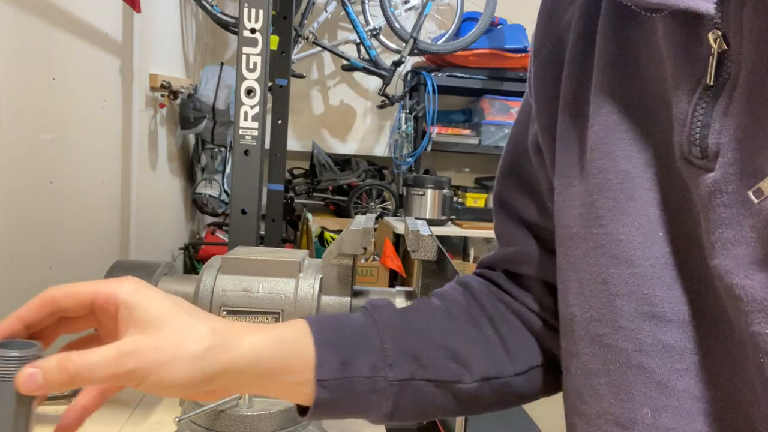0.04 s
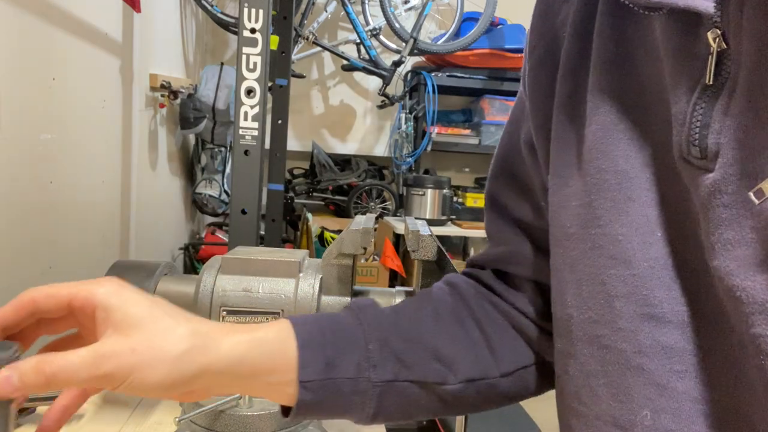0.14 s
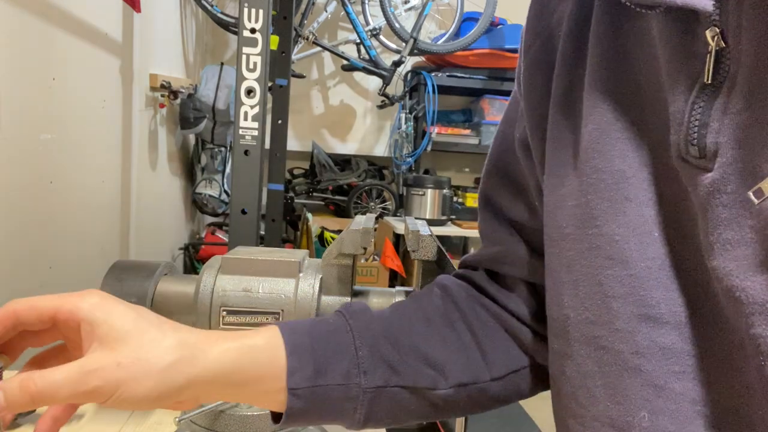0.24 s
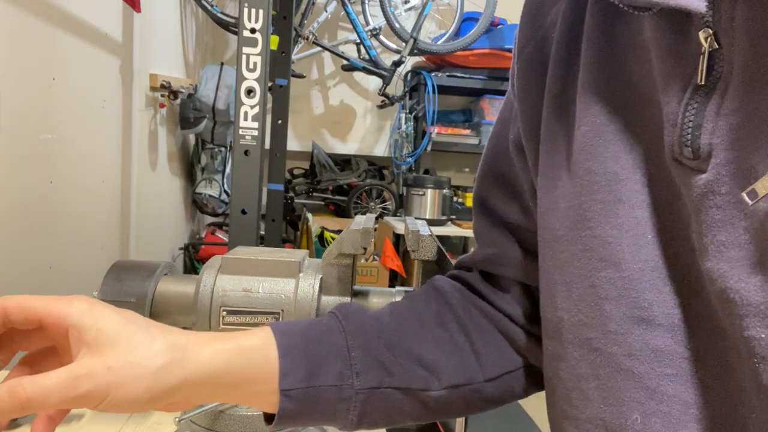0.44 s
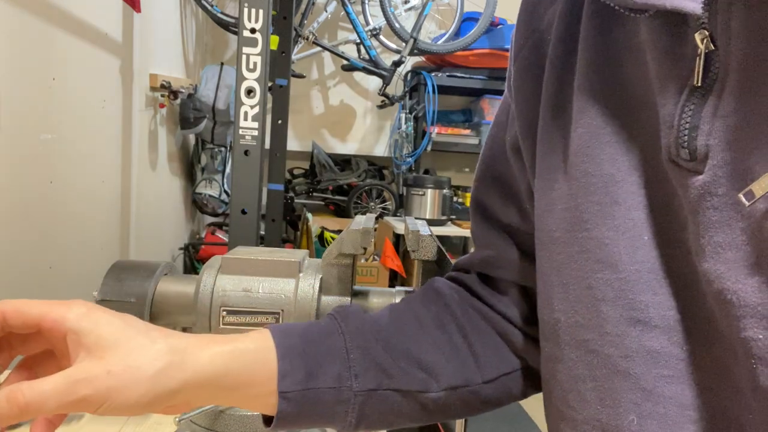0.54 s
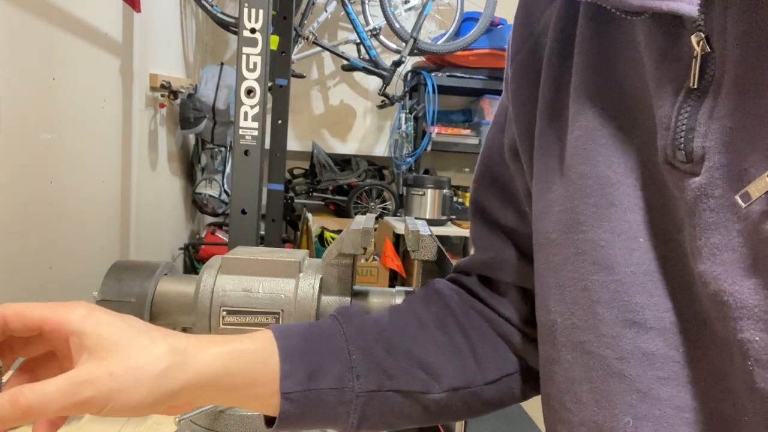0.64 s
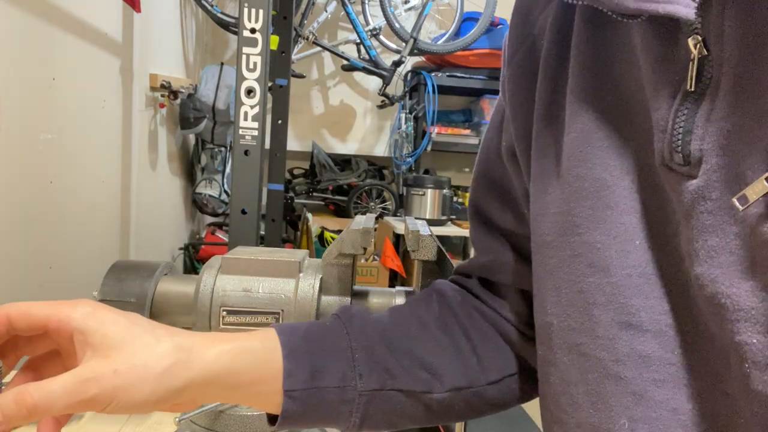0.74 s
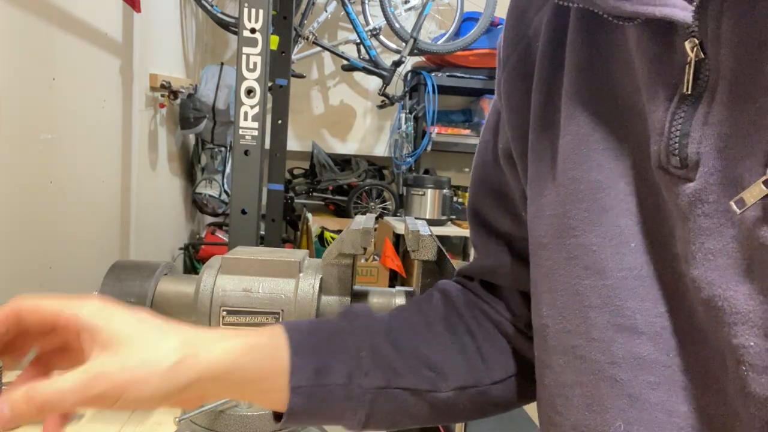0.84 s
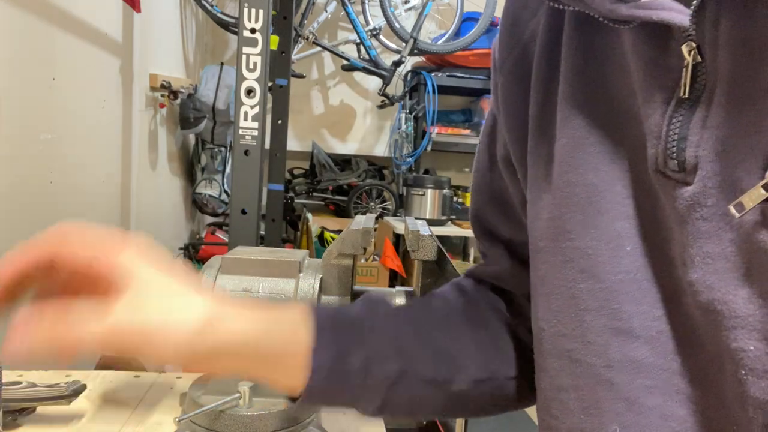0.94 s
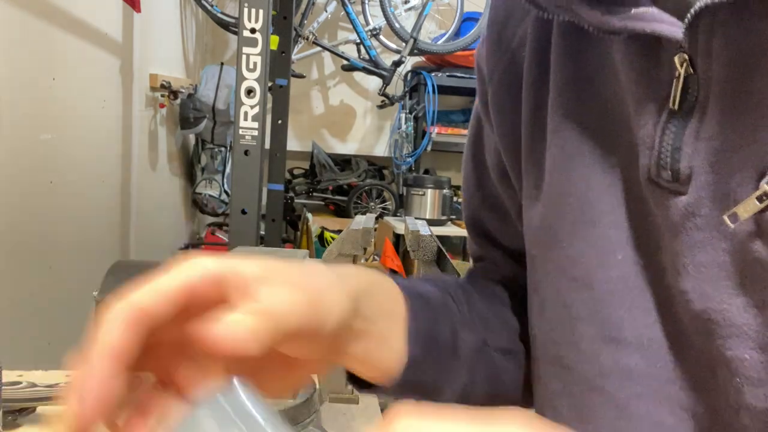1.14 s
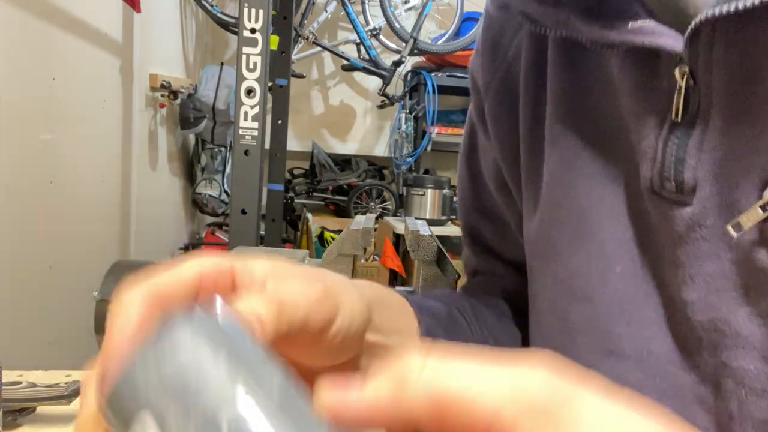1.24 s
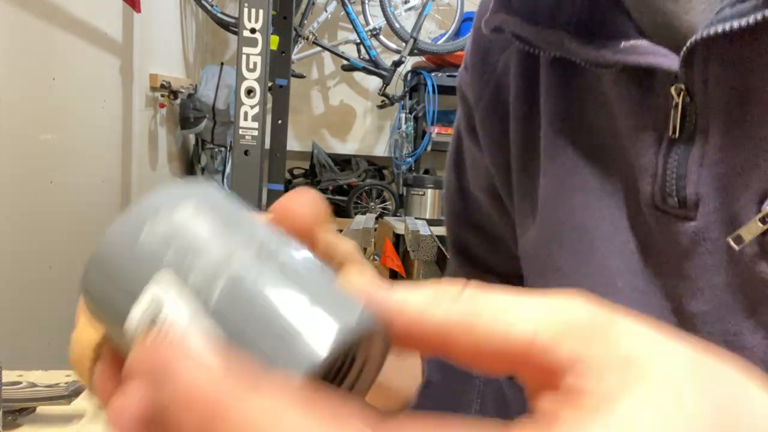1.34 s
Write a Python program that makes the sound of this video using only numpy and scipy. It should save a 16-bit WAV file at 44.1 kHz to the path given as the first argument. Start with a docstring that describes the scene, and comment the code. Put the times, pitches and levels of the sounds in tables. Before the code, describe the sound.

A hard plastic pipe fitting lands on a wooden bench with one loud hollow knock as an earlier knock fades; the garage rings briefly, then faint finger brushing, a soft tap and a tick, heard close.

```python
"""Plastic fitting on a workbench

A hard plastic pipe fitting is set down on a wooden bench in a garage, close by on the left: damped modes.
It rocks while an earlier knock (fading noise) dies away, then lands with one hollow knock that rings in the room.
Fingers brush the plastic (grainy noise); then come a soft tap, a sleeve rustle and one sharp tick (noise bands).
Low rumble and faint hiss, both steady noise, lie under it all."""
import sys
import numpy as np
from scipy import signal
from scipy.fft import rfft, irfft, next_fast_len
from scipy.io import wavfile
from scipy.ndimage import map_coordinates

SR = 44100
rng = np.random.default_rng(int(sys.argv[2]) if len(sys.argv) > 2 else 0)


def bounce(signal):
    """Save signal as a 16-bit WAV file at the path given by the first command-line argument."""
    frames = np.transpose(np.atleast_2d(signal))
    limited = np.clip(frames, -1, 1)
    pcm = np.round(limited * 32767).astype(np.int16)
    wavfile.write(sys.argv[1], SR, pcm)


N = 61739

# Still air, rumble and hiss. Each row: frequency in Hz, relative level in dB per Hz.
RUMBLE_SPECTRUM = [(25, -22), (45, -14.5), (74, 3.5), (97, -14), (122, -8), (150, -25), (205, -19),
                   (300, -28.5), (430, -28), (600, -39), (1500, -56)]
HISS_SPECTRUM = [(1000, 5.5), (2500, -1.5), (6000, -6.5), (8400, -0.5), (10500, -14.5), (12500, -9)]
RUMBLE_DB, HISS_DB = -63, -81.5

# Earlier knock, already fading. Each row: frequency in Hz, relative level in dB per Hz.
FADING_SPECTRUM = [(30, -23.5), (70, -4.5), (200, -2), (400, 0.5), (560, 5), (850, -5.5), (1100, -13.5),
                   (1600, -26.5), (2300, -38), (8000, -55.5)]
FADING_DB = -35
# Rocking contacts. Each row: start in seconds, level in dB.
ROCKING = [(0.063, -40), (0.085, -39), (0.129, -41)]
# Modes rung by rocking. Each row: frequency in Hz, relative level in dB, T60 in seconds.
ROCK_MODES = [(530.4, 1.5, 0.069), (626, 1, 0.04)]

LEAD_IN_GROWTH_S, LEAD_IN_FINAL_DB = 0.0034, -23

# Rim contacts of the knock. Each row: start in seconds, level in dB, left over right in dB.
RIM_CONTACTS = [(0.23286, -3.9, 6.1), (0.23496, -4.4, 4.3), (0.23779, 2, -1.2), (0.2506, -8.2, -.8)]
# Modes of the hollow fitting. Each row: frequency in Hz, level in dB, T60 in seconds, left over right in dB.
FITTING_MODES = [(845, -3.9, .044, 3), (1076, -13, .028, 4), (1179, -24.6, .13, -3), (1273, -28, .045, 4),
                 (1376, -30, .059, -7), (1636, -36, .079, 4), (2420, -35, .04, -5)]
# Modes of the bench top. Each row: frequency in Hz, level in dB, T60 in seconds, left over right in dB.
BENCH_MODES = [(108, -27, .18, 4), (168, -32, .22, 4), (240, -18, .1, 2), (322, -19, .09, -3),
               (380, -18.5, .086, -4), (442, -13.4, .052, -1), (527, -15.5, .11, 7), (574, -15, .04, 7),
               (631, -22.8, .08, 3), (705, -27, .15, 5)]
ATTACK_S, BENCH_ATTACK_S, RIGHT_LAG_S = .00048, .00085, .00031
LOW_CUT_HZ = 75
# Noise of the first contact. Each row: frequency in Hz, relative level in dB.
CRACK_SPECTRUM = [(1200, -10), (2400, 7), (3100, -4.5), (9300, -14), (10500, -29.5), (13000, -17),
                  (15000, -37.5)]
CRACK_DB, CRACK_T60_S, CRACK_SIDE_DB = -41, 0.15, -2.5
SNAP_DB, SNAP_T60_S, SNAP_RISE_S = -39, 0.016, 0.0006  # hard first instant of the crack

# Lingering garage resonances. Each row: frequency in Hz, level in dB.
ROOM_MODES = [(129, -32), (376, -31.5), (481, -34), (838, -34.5), (1068, -43), (1165, -40.5)]
# Garage decay. Each row: frequency in Hz, T60 in seconds.
ROOM_T60 = [(80, 0.74), (210, 0.5756), (1200, 0.5945), (2200, 0.4677), (4000, 0.47), (8000, 0.2745),
            (13000, 0.29)]
# Colour of the garage's answer. Each row: frequency in Hz, relative level in dB.
ROOM_COLOUR = [(40, -27), (70, -7.5), (130, -1), (230, -4), (400, 1), (700, 2), (900, -4), (1170, 0.5),
               (1450, -8), (1800, -21.5), (2400, -21), (4000, -32), (9200, -36.5), (10300, -55.5),
               (13000, -47.5)]
# Stereo likeness. Each row: frequency in Hz, left-right correlation from -1 to 1.
ROOM_ALIKE = [(300, 0.89), (700, -0.38), (5000, 0.34)]
WASH_DB, RING_WET_DB = -21.5, -20
ROOM_MODE_T60_S, ROOM_BUILD_S = .5, .017

# Brushing stroke. Each row: time in seconds, treble level in dB, upper middle level in dB.
BRUSH_LEVELS = [(0.615, -100, -102), (0.64, -67, -80), (0.668, -58.5, -74.5), (0.68, -53.5, -63.5),
                (0.728, -62, -65.5), (0.765, -68, -78), (0.785, -85, -92), (0.82, -108, -115)]
# Colours of the two brushing layers. Each row: frequency in Hz, relative level in dB.
BRUSH_TOP_SPECTRUM = [(4000, -40.5), (6500, -16), (8600, 3), (10300, -17), (11700, 7), (13600, 8),
                      (14500, -12.5)]
BRUSH_BODY_SPECTRUM = [(500, -5), (1500, -9), (2200, -7), (2800, -24), (3700, -0.5), (5500, -7.5),
                       (8000, 0.5), (11000, -23.5)]
# Narrow noise bands: a soft swell as brushing starts, a faint fading one, one sharp tick in three bands.
# Each row: start in seconds, level in dB, centre in Hz, width at half amplitude in Hz, attack in seconds,
# T60 in seconds.
NOISE_BANDS = [(0.641, -65.5, 2110, 445, 0.012, 0.24), (1.27, -77, 3980, 150, 0.025, 0.33),
               (1.359, -55.5, 4066, 90, 0.0022, 0.028), (1.359, -63.5, 12700, 2500, .003, 0.035),
               (1.359, -60, 8900, 1400, 0.0022, 0.033)]
# Modes of the soft tap. Each row: frequency in Hz, level in dB.
TAP_MODES = [(450, -64.5), (690, -59.5), (850, -60.5)]
TAP_S, TAP_T60_S = .9905, .02
# Sleeve rustle as the arm comes back. Each row: time in seconds, level in dB.
SLEEVE_LEVELS = [(1.12, -103), (1.27, -76.5), (1.335, -81.5), (1.36, -72), (1.4, -73.5)]
# Colour of the rustle. Each row: frequency in Hz, relative level in dB.
SLEEVE_SPECTRUM = [(1000, 0), (4200, 1), (6300, -11.5), (8600, 8), (10500, -11), (12800, 2)]

TOP_HZ = 15100


def amp(db):
    """Decibels to gain."""
    return 10 ** (np.asarray(db) / 20)


def unit(x):
    """Scaled to rms 1."""
    return x / np.sqrt(np.mean(x ** 2) + 1e-20)


def along(points, hz):
    """(Hz, value) points read on a log frequency axis."""
    f, v = np.transpose(points)
    return np.interp(np.log(hz + 1), np.log(f + 1), v)


def since(s):
    """Seconds since a moment, zero before it."""
    return np.maximum(np.arange(N) / SR - s, 0)


def curves(rows):
    """One value per sample for each column after the time."""
    s, *cols = np.transpose(rows)
    return [np.interp(since(0), s, c) for c in cols]


def filtered(x, response):
    """x times a response of frequency."""
    m = next_fast_len(N + SR // 2)
    return irfft(rfft(x, m) * response(np.fft.rfftfreq(m, 1 / SR)), m)[..., :N]


def noise(spectrum, alike):
    """Coloured stereo noise of rms 1; the mid-side balance sets the left-right correlation."""
    def mid_side_response(hz):
        turn = np.arccos(np.clip(along(alike, hz), -1, 1)) / 2
        return amp(along(spectrum, hz)) * [np.cos(turn), np.sin(turn)]

    mid, side = filtered(rng.standard_normal((2, N)), mid_side_response)
    return unit(np.array([mid + side, mid - side]))


def pan(db):
    """Left and right gains for a left-over-right ratio in dB."""
    return amp(np.array([[db], [-db]]) / 2)


def decay(t, t60_s):
    """Exponential decay, 60 dB down after t60_s."""
    return np.exp(-np.log(1000) * t / t60_s)


def strike(t, attack_s, t60_s):
    """Quick rise and exponential decay."""
    return (1 - np.exp(-t / attack_s)) * decay(t, t60_s)


def sine(hz, t):
    """Sine starting at phase zero."""
    return np.sin(2 * np.pi * hz * t)


def dying(x, s):
    """From time s on, each frequency of x dies at the room's own speed."""
    hz, t, z = signal.stft(x, SR, nperseg=512)
    fade = decay(np.maximum(t - s, 0), along(ROOM_T60, hz)[:, None])
    return signal.istft(z * fade, SR, nperseg=512)[1][:, :N]


def ringing(modes, attack_s, t):
    """Damped modes, each leaning to one side."""
    return sum(amp(db) * pan(lean_db) * strike(t, attack_s, t60_s) * sine(hz, t)
               for hz, db, t60_s, lean_db in modes)


def build_up(t):
    """Reflections gather over the first milliseconds."""
    return 1 - np.exp(-(t / ROOM_BUILD_S) ** 2)


def air():
    """Still air: a low rumble, slightly left, and a faint hiss, both steady noise."""
    rumble = amp(RUMBLE_DB) * pan(2.4) * noise(RUMBLE_SPECTRUM, [(100, 1.0), (500, .3)])
    hiss = amp(HISS_DB) * noise(HISS_SPECTRUM, [(4000, .2), (8000, 0.51)])
    return rumble + hiss


def earlier_knock(early_db=-36, early_t60_s=0.23):
    """An earlier knock fades, quickly at first and then with the room."""
    t = since(0)
    early = amp(early_db) * strike(t, ATTACK_S, early_t60_s) * noise(FADING_SPECTRUM, ROOM_ALIKE)
    late = amp(FADING_DB) * dying(noise(FADING_SPECTRUM, ROOM_ALIKE), 0)
    return (early + late) * (1 - np.exp(-t / ATTACK_S))


def rocking(attack_s=0.003):
    """The fitting rocks softly; each contact rings two damped modes."""
    out = np.zeros(N)
    for s, db in ROCKING:
        t = since(s)
        for hz, mode_db, t60_s in ROCK_MODES:
            out += amp(db + mode_db) * strike(t, attack_s, t60_s) * sine(hz, t)
    return out


def lead_in():
    """A faint noise swell grows exponentially into the knock, then stops."""
    s, _, side_db = RIM_CONTACTS[0]
    before = since(s) == 0
    rise = np.exp(np.minimum(since(0) - s, 0) / LEAD_IN_GROWTH_S) * before
    return amp(LEAD_IN_FINAL_DB) * pan(side_db) * rise * noise(ROOM_COLOUR, ROOM_ALIKE)


def knock():
    """Rim contacts ring fitting and bench, which radiate no deep bass; the first also snaps and cracks."""
    out = np.zeros((2, N))
    for s, db, side_db in RIM_CONTACTS:
        t = np.array([since(s), since(s + RIGHT_LAG_S)])
        modes = ringing(FITTING_MODES, ATTACK_S, t) + ringing(BENCH_MODES, BENCH_ATTACK_S, t)
        out += amp(db) * pan(side_db) * modes
    out = filtered(out, lambda hz: 1 - 1 / (1 + (hz / LOW_CUT_HZ) ** 4))
    t = since(RIM_CONTACTS[0][0])
    snap = amp(SNAP_DB) * strike(t, SNAP_RISE_S, SNAP_T60_S)
    crack = amp(CRACK_DB) * strike(t, ATTACK_S, CRACK_T60_S)
    return out + pan(CRACK_SIDE_DB) * (snap + crack) * noise(CRACK_SPECTRUM, ROOM_ALIKE)


def garage(direct):
    """The cluttered room scatters the knock into a dense wash and prolongs its ring; resonances stand out."""
    s = RIM_CONTACTS[0][0]
    t = since(s)
    wash = amp(WASH_DB) * dying(noise(ROOM_COLOUR, ROOM_ALIKE), s)
    modes = sum(amp(db) * strike(t, ATTACK_S, ROOM_MODE_T60_S) * sine(hz, t) for hz, db in ROOM_MODES)
    # impulse response: white noise dying with the room
    tail = build_up(since(0)) * dying(rng.standard_normal((2, N)), 0)
    ring = signal.fftconvolve(direct, tail / np.linalg.norm(tail[0]), axes=1)[:, :N]
    return build_up(t) * (wash + modes) + amp(RING_WET_DB) * ring


def grain(rough_db=2, grain_hz=400):
    """Fine uneven gain of rubbing: random dB values joined by straight lines."""
    steps = rng.standard_normal(N)
    return amp(rough_db * map_coordinates(steps, [since(0) * grain_hz], order=1))


def brushing():
    """Fingers slide over the plastic: treble and upper middle noise with a fine grain."""
    top_db, body_db = curves(BRUSH_LEVELS)
    top = amp(top_db) * noise(BRUSH_TOP_SPECTRUM, [(9000, 0.85)])
    body = amp(body_db) * noise(BRUSH_BODY_SPECTRUM, [(4000, .3)])
    return grain() * (top + body)


def noise_bands():
    """Narrow noise bands: a soft swell as brushing starts, a faint fading one, one sharp tick in three bands."""
    out = np.zeros((2, N))
    for s, db, hz, width_hz, attack_s, t60_s in NOISE_BANDS:
        white = noise([(100, 0)], [(1000, 0.13)])
        band = unit(filtered(white, lambda f: 1 / (1 + (2 * (f - hz) / width_hz) ** 2)))
        out += amp(db) * strike(since(s), attack_s, t60_s) * band
    return out


def tap():
    """One soft touch rings the plastic very briefly."""
    t = since(TAP_S)
    return strike(t, ATTACK_S, TAP_T60_S) * sum(amp(db) * sine(hz, t) for hz, db in TAP_MODES)


def sleeve():
    """The sleeve rustles as the arm comes back: grainy noise."""
    level_db, = curves(SLEEVE_LEVELS)
    return grain() * amp(level_db) * noise(SLEEVE_SPECTRUM, [(4000, .3), (8000, 1.0)])


def scene():
    """All sources in the garage."""
    direct = knock()
    before = air() + earlier_knock() + rocking() + lead_in()
    after = brushing() + noise_bands() + tap() + sleeve()
    return before + direct + garage(direct) + after


def record(dry):
    """The recorder keeps nothing above its band limit."""
    return filtered(dry, lambda hz: 1 / (1 + (hz / TOP_HZ) ** 80))


dry = scene()
out = record(dry)
bounce(out)
```